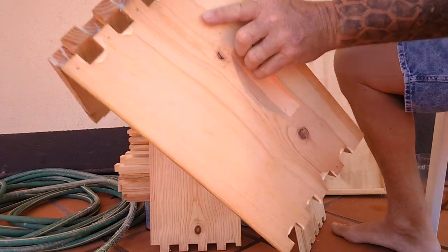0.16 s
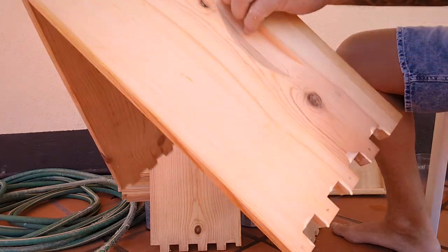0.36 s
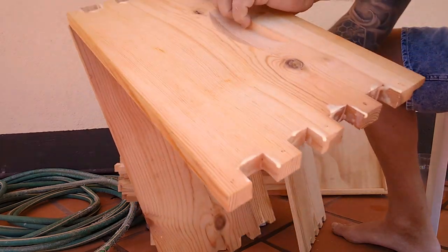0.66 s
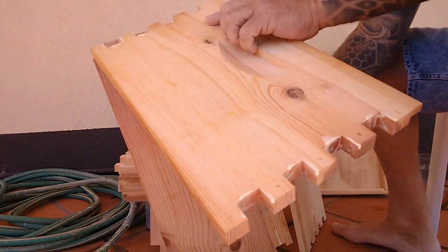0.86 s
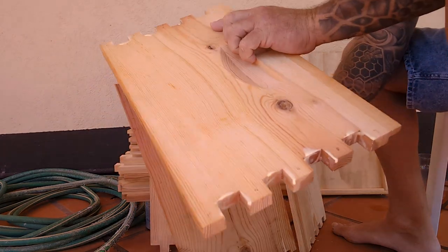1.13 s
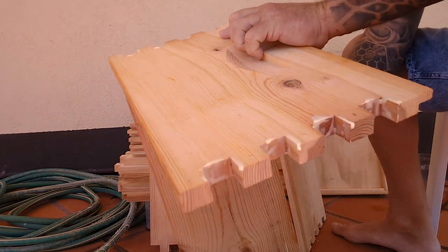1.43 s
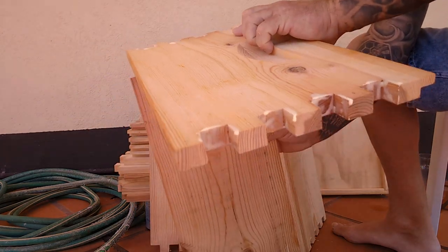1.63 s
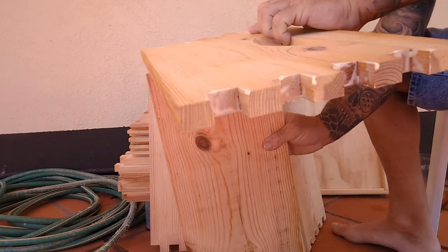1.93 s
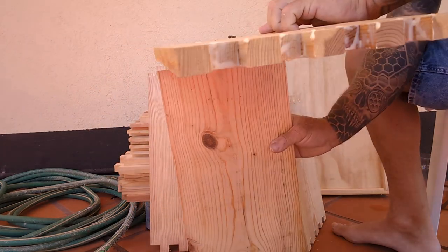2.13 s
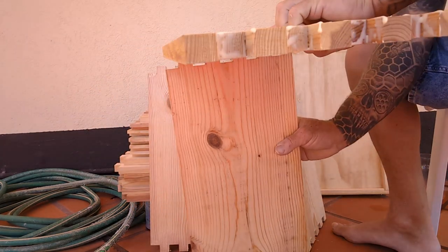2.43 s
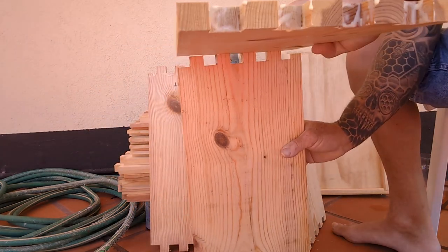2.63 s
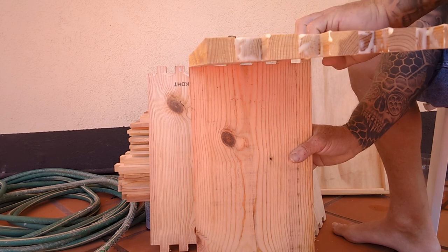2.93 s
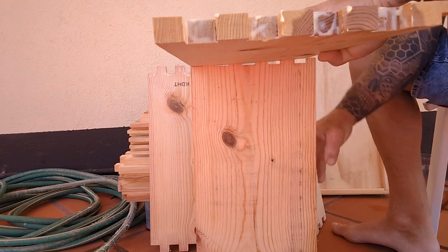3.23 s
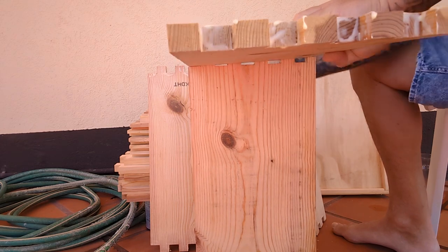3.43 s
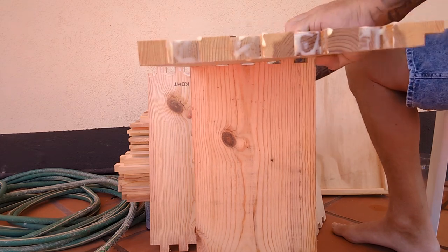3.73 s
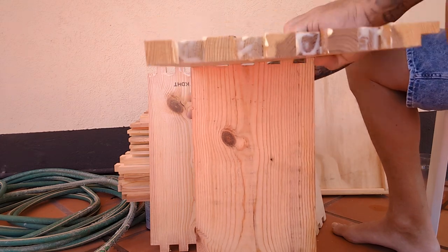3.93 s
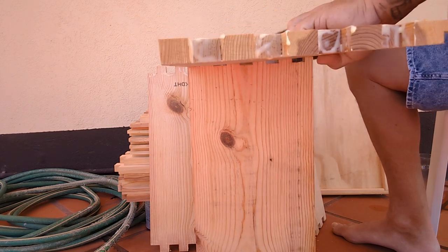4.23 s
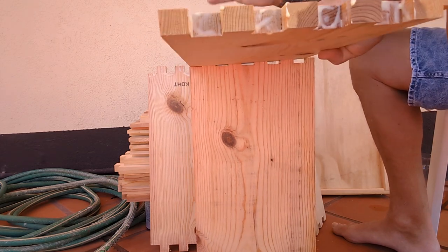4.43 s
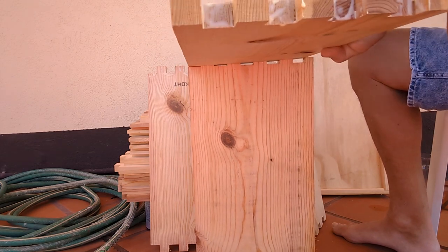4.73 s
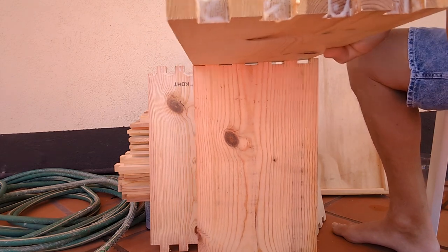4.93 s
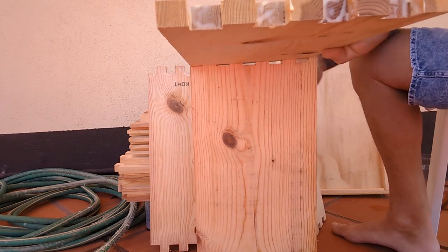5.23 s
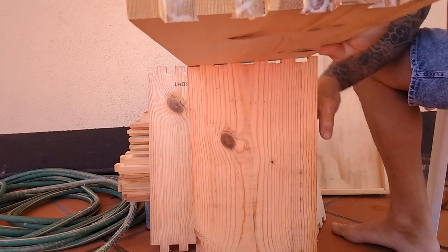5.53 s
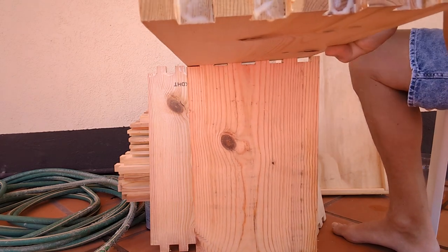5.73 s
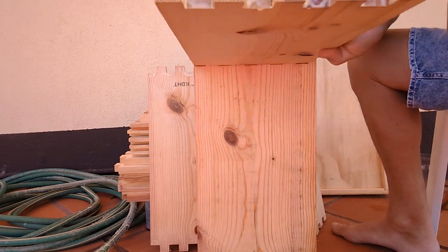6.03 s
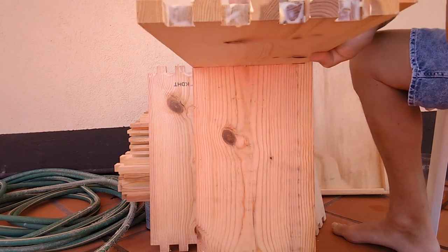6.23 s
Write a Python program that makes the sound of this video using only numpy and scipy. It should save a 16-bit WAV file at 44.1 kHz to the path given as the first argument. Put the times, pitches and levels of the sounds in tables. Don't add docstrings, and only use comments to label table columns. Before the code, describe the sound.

Pine boards with finger joints creak, then are knocked together by hand in hollow woody thumps, with rubbing between, over faint outdoor traffic rumble.

```python
import sys
import numpy as np
from scipy import signal
from scipy.fft import rfft, irfft
from scipy.io import wavfile
from scipy.ndimage import uniform_filter1d

SR = 44100
rng = np.random.default_rng(int(sys.argv[2]) if len(sys.argv) > 2 else 0)


def output_pcm(signal):
    pcm = np.clip(np.atleast_2d(signal).T, -1, 1) * 32767
    wavfile.write(sys.argv[1], SR, np.round(pcm).astype(np.int16))


def gain_from_db(level_db):
    decades = np.asarray(level_db, float) / 20
    return 10 ** decades


N = 280917
TIME = np.arange(N) / SR


def unit(x):
    return x / np.sqrt(np.mean(x ** 2))


def colour(x, points):
    hz, db = np.transpose(points)
    size = x.shape[-1]
    f = np.arange(size // 2 + 1) * SR / size
    return irfft(rfft(x) * gain_from_db(np.interp(np.log(f + 1), np.log(hz), db)), size)


def peak(x, hz, width):
    return signal.lfilter(*signal.iirpeak(hz, hz / width, fs=SR), x)


def walk(rate, size=N):
    hold = int(SR / rate)
    steps = np.repeat(rng.standard_normal(size // hold + 1), hold)
    return unit(uniform_filter1d(steps, hold)[:size])


def envelope(points):
    return gain_from_db(np.interp(TIME, *np.transpose(points)))


def add(out, s, sound):
    i = int(s * SR)
    out[..., i:i + sound.shape[-1]] += sound[..., :N - i]


def town():
    # frequency in Hz, level in dB per Hz
    town_spectrum = [(15, -21), (25, 0), (55, -2), (145, 4.5), (195, -7.5), (242, -2.5), (427, -13),
                     (503, -8), (677, -18.5), (1740, -23.5), (2990, -31.5), (5600, -45), (6500, -44.5),
                     (8000, -51.5), (13200, -55), (16000, -71)]
    # time in seconds, level in dB
    traffic = [(0.0, -43), (0.98, -47.5), (1.4, -42), (3.25, -46), (3.89, -63), (5.1, -49), (5.55, -50.5),
               (6.25, -42.5)]
    # pitch in Hz, width in Hz, level in dB
    engines = [(55, 4.5, -3), (58.8, 39, -2.5), (82.9, 1.3, -10), (133.3, 20, -12)]
    mid, side = rng.standard_normal((2, N))
    side = colour(side, [(60, -12.5), (290, -6.5), (1000, 2.0), (5000, -0.5), (8000, -6), (16000, -8.0)])
    air = unit(colour(mid + side * np.array([[1], [-1]]), town_spectrum)) * gain_from_db(-47.5 + walk(3.47))
    drone = 0
    for hz, width_hz, db in engines:
        engine = peak(peak(rng.standard_normal(N), hz, width_hz), hz, width_hz)
        drone = drone + gain_from_db(db) * unit(engine)
    drone = unit(drone) * envelope(traffic) * gain_from_db(-1.0)
    horn_hz, horn_db, horn_end_s = 223.4, -49, 0.6
    fading = np.clip((horn_end_s - TIME) / 0.39, 0, 1)
    horn = np.sin(2 * np.pi * horn_hz * TIME + .5 * walk(8.8)) * fading * gain_from_db(horn_db + 2.0 * walk(7.1))
    return air + drone + horn


def bird():
    # start in seconds, end in seconds, pitch in Hz, level in dB
    peeps = [
        (1.225, 1.27, 7200, -70),
        (1.246, 1.336, 6450, -64.5),
        (1.3, 1.46, 4880, -59.5),
        (2.842, 2.92, 3110, -61),
        (3.606, 3.67, 6060, -59),
        (0.109, 0.206, 391, -47),
    ]
    out = np.zeros(N)
    for start, end, hz, db in peeps:
        u = np.clip((TIME - start) / (end - start), 0, 1)
        level = gain_from_db(db - 17.5 * u + 2 * walk(46.0)) * np.minimum(8 * u * (1 - u), 1)
        out += level * np.sin(2 * np.pi * hz * TIME + 1.3 * walk(80))
    return out


def breeze():
    # time in seconds, level in dB
    gusts = [(0, -71), (3.5, -51), (3.7, -22.5), (3.85, -37.5), (4.2, -36), (4.45, -43), (6.0, -64),
             (6.12, -37), (6.37, -48)]
    flutter = unit(colour(rng.standard_normal(N), [(30, 6.0), (50, 13), (90, 8), (200, -63.0)]))
    return flutter * envelope(gusts) * np.array([[.1], [1]])


def porch(x):
    # centre in Hz, t60 in seconds, level in dB, stereo width from 0 to 1
    tail_bands = [(121, 0.26, -21, 0.11), (660, 0.28, -23, 0.14), (2010, 0.23, -15.5, 0.81),
                  (6000, 0.093, -13, 1), (12000, 0.11, -30, 0.4)]
    t = TIME[:SR // 2]
    tail = 0
    for hz, t60, db, width in tail_bands:
        mid, side = rng.standard_normal((2, len(t)))
        band = peak(mid + width * side * np.array([[1], [-1]]), hz, 1.08 * hz)
        band = band * gain_from_db(-60 * t / t60) * np.minimum(t / 0.0035, 1)
        tail = tail + gain_from_db(db) * band / np.sqrt(np.sum(band ** 2) / 2)
    return signal.fftconvolve(x[None], tail, axes=1)[:, :N]


def rubbing():
    # time in seconds, level in dB
    rustle = [(0.0, -83), (1.0, -79), (1.28, -71.5), (1.9, -80), (3.4, -74.5), (3.76, -63.5), (4.3, -67.5),
              (4.55, -70.5), (5.25, -67), (5.5, -65), (6.37, -60.5)]
    # start in seconds, length in seconds, level in dB
    brushes = [(0.559, 0.12, -61), (2.781, 0.098, -58), (2.89, 0.11, -68.5), (3.154, 0.17, -52.5),
               (3.596, 0.14, -62), (3.714, 0.21, -57), (3.983, 0.11, -52.5), (4.154, 0.32, -66.5),
               (4.693, 0.12, -62.5), (5.023, 0.11, -61), (5.373, 0.17, -60), (5.524, 0.072, -57),
               (5.634, 0.085, -67), (5.779, 0.1, -59)]
    # start in seconds, length in seconds, level in dB
    slides = [
        (0.701, 0.17, -61),
        (1.012, 0.14, -58),
        (1.69, 0.18, -62.5),
        (2.185, 0.078, -65.5),
        (3.116, 0.21, -62.5),
        (5.4, 0.3, -67.5),
    ]
    # start and length in seconds, first and last Hz, level in dB
    skids = [
        (3.165, 0.14, 13200, 12200, -54),
        (3.378, 0.096, 9500, 7900, -58.5),
        (3.379, 0.1, 12800, 12800, -67),
        (3.777, 0.1, 7930, 9040, -51),
        (4.165, 0.13, 8800, 8550, -54),
        (5.613, 0.0094, 7800, 7800, -48),
    ]
    fibres = rng.standard_normal((3, N))
    cloth = colour(fibres[0] + 0.43 * fibres[1:],
                   [(2500, 8), (6500, 3.0), (9800, -1.0), (12500, 1.0), (16000, -7)])
    out = unit(cloth) * envelope(rustle) * gain_from_db(3.3 * walk(36) + np.array([[-.5], [3]]))

    brush_hz, brush_width_hz = 10460, 14400
    slide_hz, slide_width_hz = 2030, 3320
    skid_width_hz = 3400
    strokes = [(s, length, brush_hz, brush_hz, db, brush_width_hz) for s, length, db in brushes]
    strokes += [(s, length, slide_hz, slide_hz, db, slide_width_hz) for s, length, db in slides]
    strokes += [(*row, skid_width_hz) for row in skids]
    for start, length, first_hz, last_hz, db, width_hz in strokes:
        size = int(1.5 * length * SR)
        u = np.arange(size) / size
        grit = rng.standard_normal((3, size))
        band = unit(colour(grit[0] + .6 * grit[1:], [(20, 0), (width_hz / 2.6, -1), (width_hz / 1.5, -16),
                                                     (width_hz * 1.5, -40)]))
        glide = np.cos(2 * np.pi * np.cumsum(first_hz + (last_hz - first_hz) * u) / SR)
        pressure = np.sin(np.pi * u ** 0.7) ** 2.33 * gain_from_db(1.4 * walk(84.0, size=SR)[:size])
        sound = pressure * band * glide
        sound = sound + 3.85 * sum(peak(sound, hz, 182) for hz in (1510, 1730, 2280, 2690, 3630))
        add(out, start - 0.15 * length, gain_from_db(db + np.array([[-2.5], [2.5]])) * sound)
    return out


def ticks():
    # time in seconds, peak in dB, left minus right in dB, treble in dB
    edge_ticks = [(1.0844, -43, -0.5, 22), (1.1118, -25.5, 14, -50), (1.151, -31, -1, -1),
                  (1.174, -41, 15, 2), (1.571, -33.5, 0, -36), (1.5944, -47, 6, -3), (1.656, -48, 2, 2),
                  (2.498, -31.5, 0.5, -30), (2.76, -32.5, 0, -41), (2.798, -34, -1, -34),
                  (3.5764, -27.5, -11, -14), (3.5842, -23, 1, -19.5), (3.674, -25.5, -12, -11),
                  (3.7053, -23.5, -17, 8), (3.716, -13, 2.5, -5), (3.941, -32.5, 3, -16),
                  (3.9857, -22, -6.5, -15.5), (4.156, -40, 1, -9), (4.654, -16.5, -4.5, -22.5),
                  (4.6687, -20.5, -8, 6), (4.7162, -27.5, 3.5, 19), (4.984, -22.5, -22.5, -35.5),
                  (4.9984, -18, 3, -20), (5.0276, -31, -6, -7), (5.6116, -43, -7, 0),
                  (6.069, -14.5, -28, -9), (6.0771, -19, 6, -12), (6.1005, -22, 14, -2)]
    # time in seconds, peak in dB, left minus right in dB, pitch in Hz, treble in dB
    creaks = [
        (0.17, -36, -3, 1680, -18),
        (0.177, -40.5, -7, 3900, -17),
        (0.5138, -33.5, 3, 3460, -15),
        (0.5897, -31, -1, 4100, -18),
        (0.6136, -35.5, -7, 2150, -20),
        (0.848, -44, 5, 3400, -10),
        (0.911, -55, 1, 4010, -16),
        (1.465, -51, -12, 3200, -40),
        (2.83, -39, 5, 3240, -24),
        (2.91, -41, 0, 2280, -24),
    ]
    # time in seconds, peak in dB, left minus right in dB, pitch in Hz
    pings = [(0.167, -41, 13, 1610), (0.168, -40, -2, 1700), (0.17, -51, 5, 2500), (0.172, -43, -6, 4960),
             (.514, -47, -6, 4930), (.514, -50, -8, 7000), (0.589, -52, -4, 4360), (.61, -41, -7, 4400),
             (1.47, -38, 16, 2480), (1.475, -51, 16, 1780), (1.572, -33, -2, 1370), (3.585, -48, 5, 1900),
             (3.677, -27, 13, 1800), (3.677, -29.5, -9, 3930), (3.704, -26.5, 11, 1900),
             (3.705, -26, 6, 3950), (3.716, -26.5, -1, 2680), (4.003, -32, -3, 580), (4.985, -29, 1, 2400),
             (6.071, -23, -7.5, 2990), (6.09, -25.5, 2, 2300), (6.31, -40, 5, 806)]
    # pitch in Hz, level in dB
    finger_modes = [(2400, 16), (3050, 2), (3800, 13.5), (4350, -23), (5200, -4), (7000, -19)]
    finger_width_hz = 126
    creak_fingers_db, edge_fingers_db = 10.5, -10
    edge_hz, ping_treble_db = 1650, -48
    broad, narrow = 0.27, 0.037
    rows = [(s, db, pan, edge_hz, treble, edge_fingers_db, broad) for s, db, pan, treble in edge_ticks]
    rows += [(*row, creak_fingers_db, broad) for row in creaks]
    rows += [(*row, ping_treble_db, edge_fingers_db, narrow) for row in pings]

    out = np.zeros((2, N))
    t = TIME[:SR // 7]
    for s, top_db, pan_db, hz, treble_db, fingers_db, width in rows:
        luck = rng.standard_normal((4, len(t)))
        length_ms = 4.05 * 2 ** ((-8 - max(top_db, -34)) / 46)
        snap = gain_from_db(-20 * t * 1000 / length_ms)
        fade = snap + gain_from_db(-20.0 - 60 * t / 0.21)
        grains = (luck[0] + 3.8 * luck[1:3]) * gain_from_db(20.2 * uniform_filter1d(luck[3], size=12))
        onset = np.minimum(t / 0.0048, 1)
        crackle = grains * fade * onset
        struck = grains * snap * onset
        fingers = sum(gain_from_db(db + fingers_db) * peak(struck, f, finger_width_hz) for f, db in finger_modes)
        ring = peak(struck if width == narrow else crackle, hz, width * hz)
        sound = gain_from_db(treble_db) * (peak(crackle, 17000, 20100) + fingers) + ring
        sides_db = np.clip([[pan_db], [-pan_db]], -14, 14) / 2
        add(out, s, gain_from_db(top_db + sides_db) * sound / np.abs(sound).max())
    return out


def knocks(out, events, modes, crowd_db, ring, boom_ring, push_ms, loose=1):
    # frequency in Hz, level in dB, t60 in seconds
    grain = np.array([(202, -12, 0.03), (478, -19.5, .1), (860, -31, 0.4), (1900, -19.5, 0.082),
                      (3160, -21, 0.0104), (4360, -48.5, 0.2)])
    spots = np.geomspace(230, 5000, num=90) * (1 + .015 * rng.standard_normal(90))
    crowd = [spots] + [np.interp(np.log(spots), np.log(grain[:, 0]), column) for column in grain.T[1:]]
    hz, db, t60 = np.hstack([np.transpose(modes), crowd])[:, :, None]
    strong = len(modes)
    db[strong:] += crowd_db
    t = TIME[:SR // 4]
    t60 = np.minimum(t60, np.where(hz > 100, .6, .7))
    t60 = t60 * np.clip(np.where(hz < 220, boom_ring, ring), .1, 1)
    press_s, press_db = 0.015, -8.5
    choke_db = press_db * (hz > 220) * (1 - np.exp(-t / press_s))
    rise = np.minimum(t / (0.69 / hz + push_ms / 1000), 1)
    swell = gain_from_db(-60 * t / t60 + choke_db) * rise
    small = swell[strong:] * np.sin(2 * np.pi * hz[strong:] * t)
    sense = np.sign(rng.standard_normal(hz.shape))
    flutter_db, wander_rad, steady_hz = 2.5, 0.95, 700
    chatter_depth = np.minimum(hz[:strong] / steady_hz, 1.3) * loose
    for s, top_db, boom_db, bite_db in events:
        luck = rng.standard_normal((4, 2048))
        tilt_db = (bite_db + 18.5) * np.log2(np.maximum(hz, 400) / 600) / 2
        gain = gain_from_db(db + (boom_db + 6.5) * (hz < 220) + tilt_db) * sense
        gain = gain * gain_from_db(1.6 * luck[0, :len(hz), None])
        hold = 154
        chatter = np.repeat(luck[2:, :96 * strong].reshape(2, -1, 96), hold, axis=2)[..., :len(t)]
        chatter = uniform_filter1d(chatter, size=hold) * chatter_depth
        wander = wander_rad * (chatter[1] - chatter[1, :, :1])
        rings = gain[:strong] * swell[:strong] * gain_from_db(flutter_db * chatter[0])
        rings = rings * np.sin(2 * np.pi * hz[:strong] * t + wander)
        rattle_ms = max(3.8 * 2 ** ((-31.0 - bite_db) / 10.5), .5)
        rattle = 0.86 * luck[1] * (np.abs(luck[1]) > 2.1) * gain_from_db(-20 * t[:2048] * 1000 / rattle_ms)
        rattle[0] = 1
        blow = rings.sum(axis=0) + signal.fftconvolve(gain[strong:, 0] @ small, rattle)[:len(t)]
        add(out, s, gain_from_db(top_db) * blow / np.abs(blow).max())


def boards():
    # pitch in Hz, level in dB, t60 in seconds
    free = [(163, 7, 0.088), (265, -5.5, 0.24), (334, 3, 0.093), (375.5, -3.5, 0.29), (486, -12.5, 0.24),
            (770, -23, 0.29), (830, -3, 0.23), (873, -2.5, 0.35), (1037, -21, 0.19), (1310, -26, 0.12),
            (1671, -16.5, 0.46), (1810, -12.5, 0.092), (2120, -22, 0.15), (2588, -20.5, 0.12)]
    tapped = [(133, 1, 0.13), (265.5, 7.5, 0.084), (345, -8, 0.13), (389, -2, 0.13), (480, -4.5, 0.16),
              (550, -12, 0.29), (786, -7, 0.42), (854, -9.5, 0.5), (1112, -24, 0.16), (1370, -33, 0.091),
              (1780, -38, 0.1), (2500, -26, .05)]
    landing = [(124, 5.5, 0.23), (173, -14, 0.13), (271, -2.5, 0.26), (406, -9.5, 0.36),
               (485.5, -9.5, 0.41), (753, 7.5, 0.091), (841, 0.5, 0.24), (945, -6, 0.2), (1155, -4.5, 0.19),
               (1327, -9.5, 0.2), (1550, -15, 0.2), (1766, -6.5, 0.078), (1900, -13.5, 0.3)]
    resting = [(52, -13, 0.18), (110.4, 2, 0.26), (134.4, 7, 0.136), (316, 3.5, 0.17), (364, 5.5, 0.098),
               (456, -3.5, 0.17), (593, -2.5, 0.15), (720, 0.5, 0.077), (765, 6, 0.092), (1680, -26, 0.1),
               (1130, -21, 0.22), (1380, -18, 0.074), (1900, -27, 0.085), (2790, -12.5, 0.12)]
    nudged = [(121, 7, 0.17), (161.5, -1.5, 0.5), (291.4, 0.5, 0.33), (338, 4.5, 0.22), (477, -3, 0.36),
              (580, -8, 0.098), (661, -5, 0.16), (784, 1.5, 0.1), (994, -7.5, 0.17), (1180, -10, 0.58),
              (1370, -6, .2), (1540, -10, 0.2), (2130, -29, 0.12)]
    seated = [(138, 6.5, 0.084), (163, 5, 0.29), (290, 0, 0.11), (357, 3.5, 0.13), (410, -10, 0.2),
              (476, 1, 0.35), (564, -2, 0.12), (778, 0.5, 0.25), (890, -5, 0.22), (1244, -15.5, 0.29),
              (1404, -9.5, 0.12), (1730, -14.5, 0.13), (1900, -16, 0.15), (2160, -23, 0.14)]
    driven = [(158, 6.5, 0.21), (207, 1.5, .15), (255, -11, 0.12), (334, -1.5, 0.19), (425, -15, 0.27),
              (555, -3.5, 0.09), (658, -0.5, 0.1), (754, -2.5, 0.13), (927, -3.5, 0.2), (1186, -11, 0.26),
              (1310, -12.5, 0.68), (1680, -9, 0.29), (1940, -11, .15), (2300, -38, .15)]
    settling = [(123, 1, 0.19), (158, -2.5, 0.24), (266.5, -2, 0.22), (348, 1.5, 0.15), (380, -1, 0.14),
                (467, -6.5, 0.23), (667, 5, 0.062), (765, -11, 0.18), (1230, -10, 0.16), (1720, -25, 0.091)]
    home = [(64.4, -1, 0.61), (126.4, -7, 0.67), (159, 2, 0.18), (318, -7, 0.25), (422, 4, 0.2),
            (515, -19, 0.44), (730, 1.5, 0.099), (822, -4.5, 0.17), (949, -1, 0.3), (1310, -8, 0.26),
            (1650, -11.5, 0.21), (1564, 0.5, 0.05), (1919, 5, 0.1), (2255, -5.5, 0.25), (2550, -7, 0.049)]
    # time in seconds, peak in dB, boom in dB, bite (hardness) in dB
    free_knocks = [
        (1.082, -33, -14, -14),
        (1.116, -5.5, -18, -9.5),
        (1.119, -6, -17, -28),
        (1.153, -16, 9, -1),
        (1.187, -21.5, -18, -44),
    ]
    free_taps = [
        (1.466, -19.5, -20, -4),
        (1.469, -12, -15.5, -15),
        (1.572, -17.5, -6, -7),
        (1.597, -26, -17, -17),
    ]
    landing_knocks = [(2.136, -36, -13, -52), (2.325, -42, -21, -42), (2.394, -41.5, -18, -30),
                      (2.477, -37.5, -20, -28), (2.499, -29, -3, -4.5), (2.742, -31, 2, -7),
                      (2.746, -21, -5.5, -30.5), (2.7686, -10.5, -8.5, -36.5), (2.7733, -9, -10.5, -22),
                      (2.797, -27.5, -21, -6), (2.814, -35, -16, -4), (3.242, -33.5, 3, -13)]
    resting_knocks = [
        (3.57, -25.5, -6, -49),
        (3.654, -37, 16, -19),
        (3.676, -33, 16, -5),
        (3.707, -19.5, 17, -4),
        (3.723, -6, -26, -26),
        (3.727, -13, -10, -13.5),
        (3.7487, -16.5, 13, -20),
        (3.756, -33, -14, -23),
        (3.841, -25.5, -8, -40),
    ]
    nudged_knocks = [
        (3.943, -24.5, -1, -29),
        (3.988, -14, -15, -15.5),
        (4.132, -33, 5, -34),
        (4.174, -28.5, -10, -34),
        (4.236, -21.5, -11, -24),
        (4.265, -31.5, 5, -23),
        (4.372, -32, -10, -51),
    ]
    seated_knocks = [
        (4.653, -19.5, 3, -5),
        (4.667, -4, -8, -18),
        (4.674, -9.5, -12.5, -20),
        (4.718, -16.5, -20, -42),
        (4.826, -30.5, -7, -45),
    ]
    driven_knocks = [
        (4.985, -22, -9, -16),
        (4.99, -25, -8, -26),
        (4.993, -10.5, -8, -37),
        (4.998, -4.5, -10, -26),
        (5.027, -25, -9, -21),
    ]
    settling_knocks = [
        (5.072, -12.5, -20.5, -26),
        (5.1, -23.5, -11, -27),
        (5.27, -19.5, -11.5, -30),
    ]
    home_knocks = [
        (6.071, -11.5, -13, -21),
        (6.074, -11.5, -16, -7),
        (6.0764, -2.5, -7, -23.5),
        (6.09, -19.5, -15, -38),
        (6.135, -23, -13, -39),
        (6.165, -34, -1, -16),
        (6.201, -40, -14, -10),
        (6.235, -30, 8.5, -23),
    ]
    wood = np.zeros(N)
    knocks(wood, free_knocks, free, crowd_db=-7.5, ring=0.66, boom_ring=0.51, push_ms=0.5, loose=0.37)
    knocks(wood, free_taps, tapped, crowd_db=-12.5, ring=0.42, boom_ring=0.54, push_ms=0.83, loose=0.47)
    knocks(wood, landing_knocks, landing, crowd_db=-3, ring=0.29, boom_ring=0.48, push_ms=2.3, loose=0.79)
    knocks(wood, resting_knocks, resting, crowd_db=-2.5, ring=0.45, boom_ring=0.34, push_ms=2.26)
    knocks(wood, nudged_knocks, nudged, crowd_db=5.5, ring=0.35, boom_ring=0.63, push_ms=1.25)
    knocks(wood, seated_knocks, seated, crowd_db=-4.5, ring=0.57, boom_ring=0.44, push_ms=1.4, loose=0.71)
    knocks(wood, driven_knocks, driven, crowd_db=2.5, ring=0.39, boom_ring=0.28, push_ms=0.94, loose=0.3)
    knocks(wood, settling_knocks, settling, crowd_db=-6.0, ring=0.38, boom_ring=0.77, push_ms=2.1)
    knocks(wood, home_knocks, home, crowd_db=5.0, ring=0.64, boom_ring=0.41, push_ms=0.7, loose=0.99)
    return wood


def shade_left(near):
    # frequency in Hz, phase in radians
    left_phase = [(0, 0), (400, -.2), (860, -.75), (1500, -.6), (1720, -.9), (2760, -3.4), (4400, -5),
                  (6400, -6.3), (22050, -6.3)]
    # frequency in Hz, level in dB
    shadow = [(60, -1.5), (500, -1.5), (1300, -1), (2400, -1.5), (4400, -3), (15000, -10)]
    f = np.arange(N // 2 + 1) * SR / N
    lag = np.exp(1j * np.interp(f, *np.transpose(left_phase)))
    left = colour(irfft(rfft(near[0]) * lag, N), shadow)
    return np.stack([left, near[1]])


def scene():
    wood = boards()
    edges = ticks()
    near = wood + edges + rubbing() + porch(wood + edges.mean(axis=0))
    return shade_left(near) + bird() + town() + breeze()


def band_limit(x):
    return signal.sosfilt(signal.butter(12, 16250, fs=SR, output="sos"), x)


def record(dry):
    rounded = np.tanh(0.67 * dry) / 0.52
    cut = signal.sosfilt(signal.butter(6, 43, "high", fs=SR, output="sos"), rounded)
    cut = signal.sosfilt(signal.ellip(8, .5, 70, 15800, fs=SR, output="sos"), cut)
    return band_limit(cut)


dry = scene()
out = record(dry)
output_pcm(out)
```